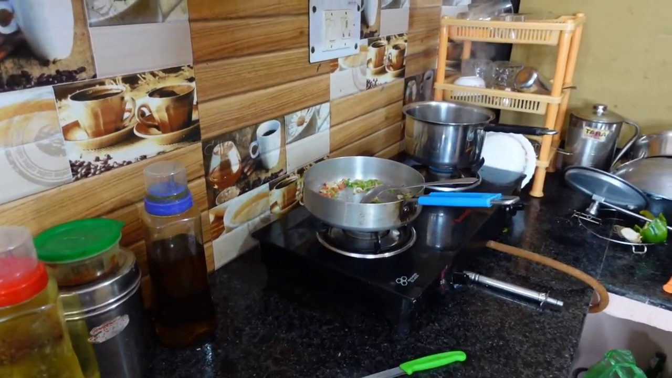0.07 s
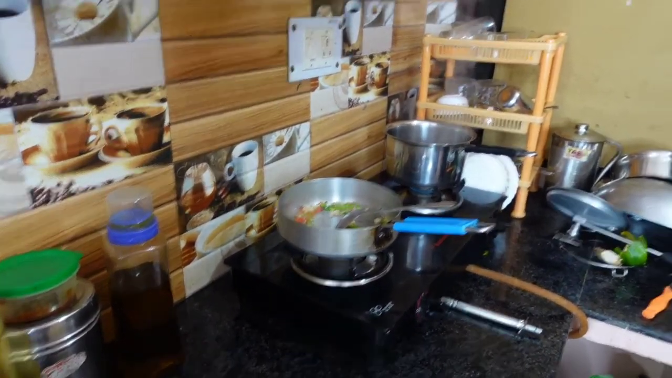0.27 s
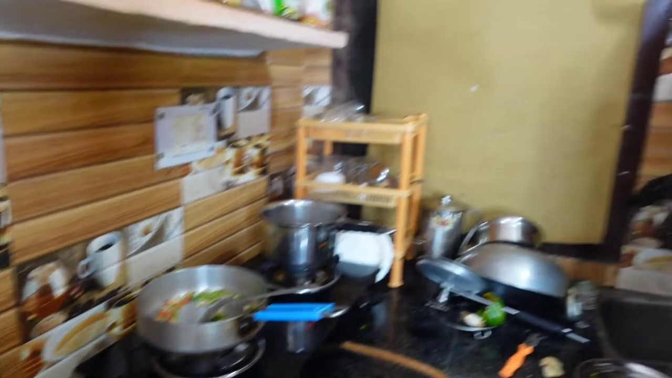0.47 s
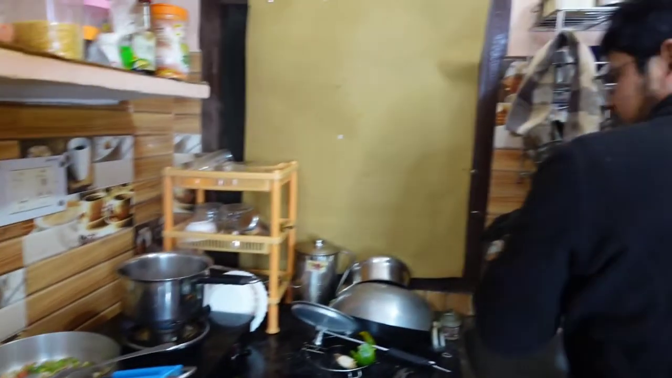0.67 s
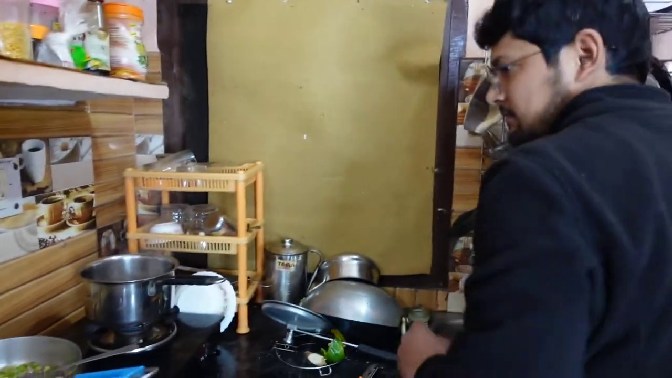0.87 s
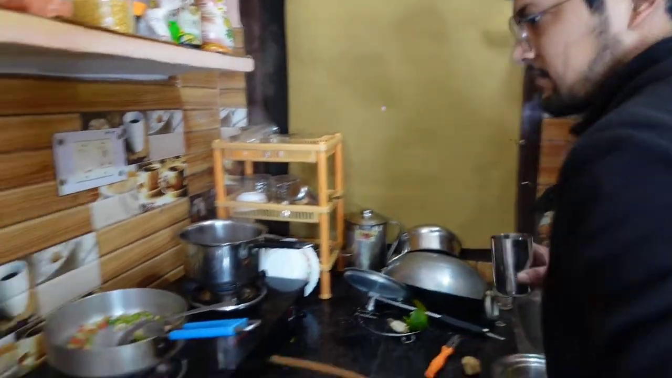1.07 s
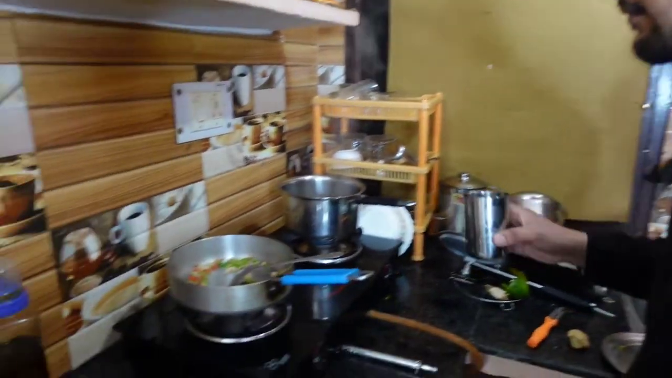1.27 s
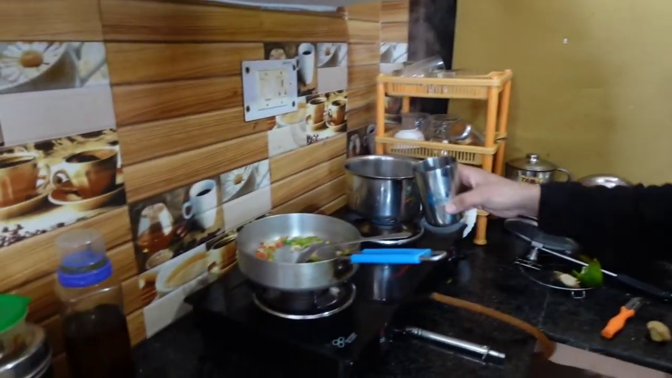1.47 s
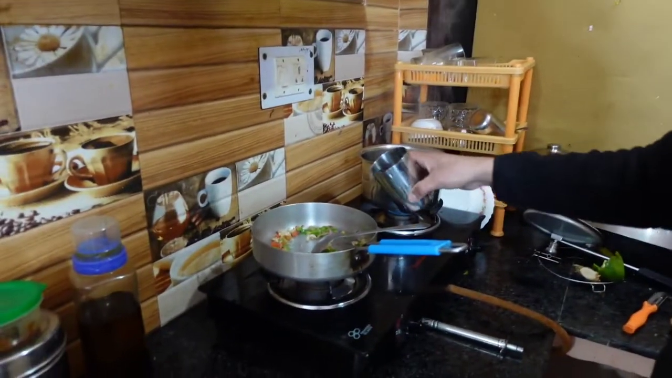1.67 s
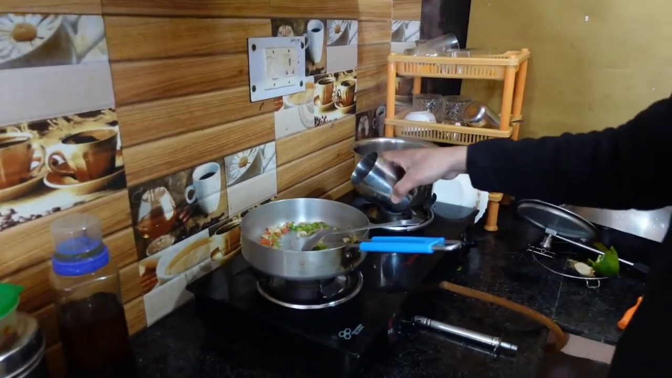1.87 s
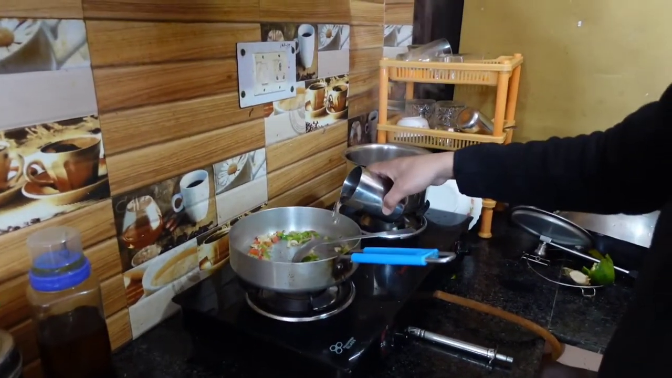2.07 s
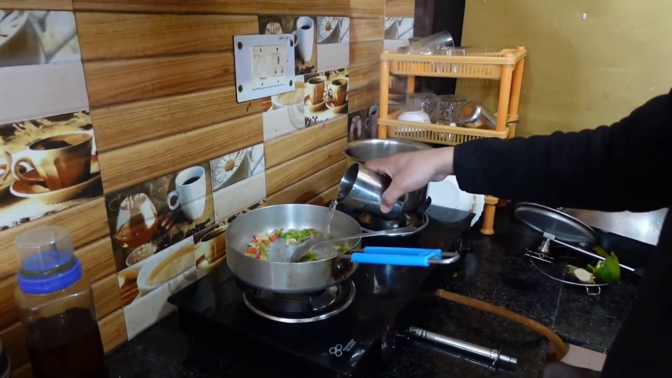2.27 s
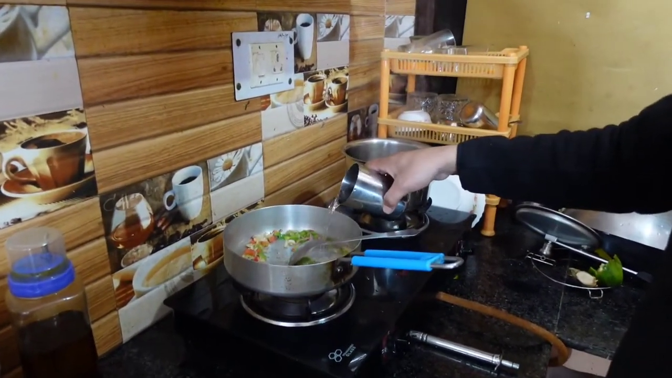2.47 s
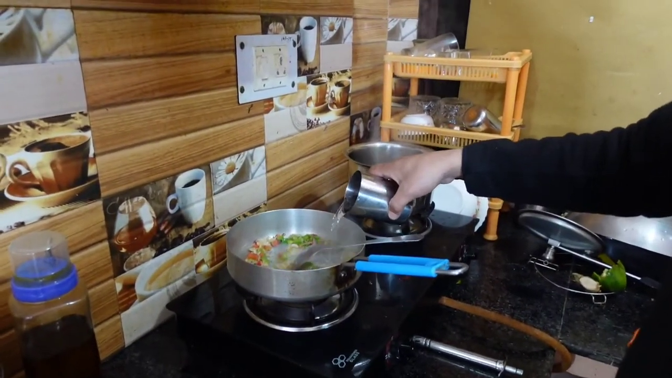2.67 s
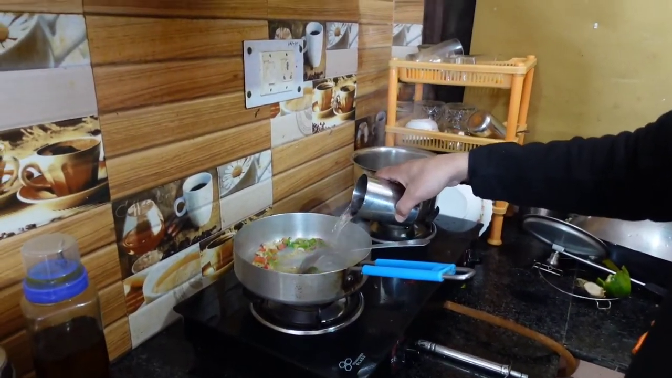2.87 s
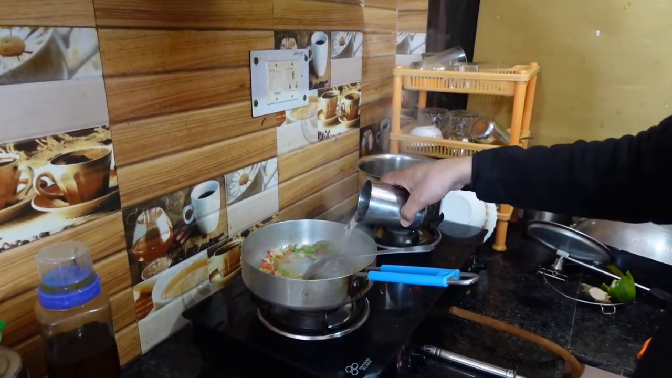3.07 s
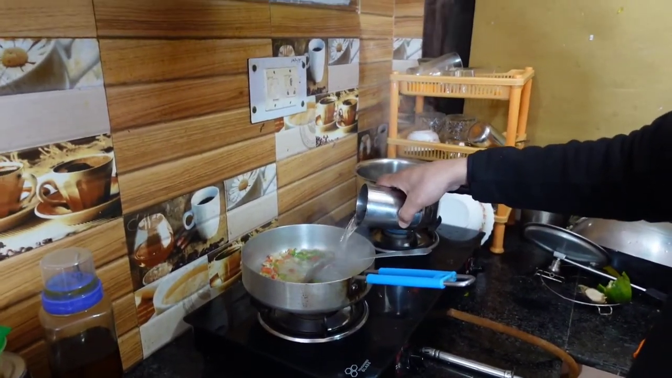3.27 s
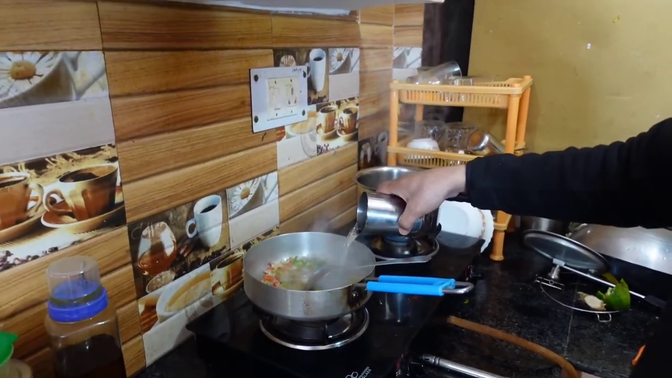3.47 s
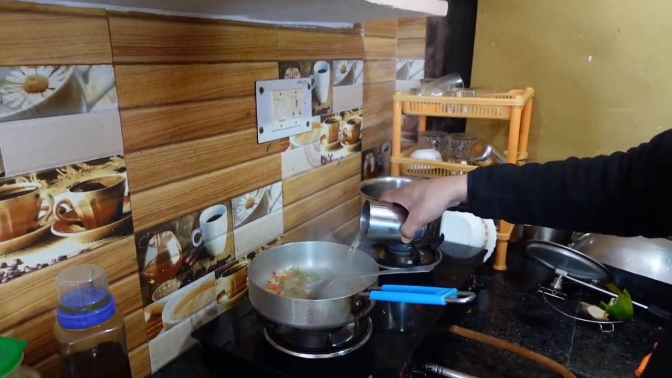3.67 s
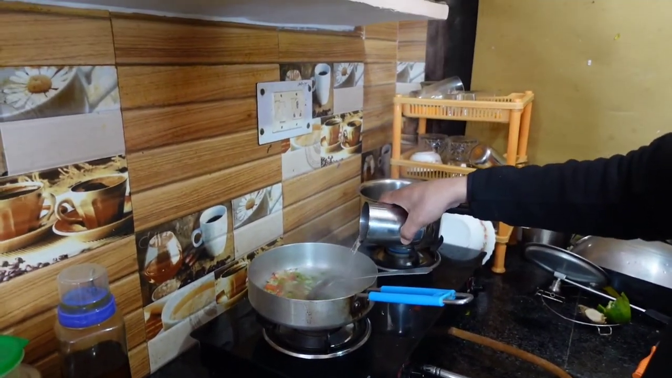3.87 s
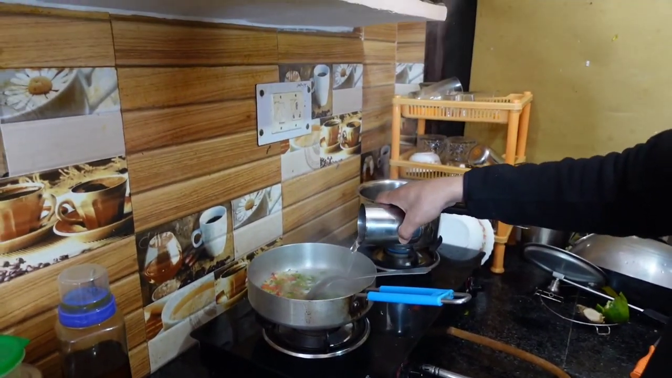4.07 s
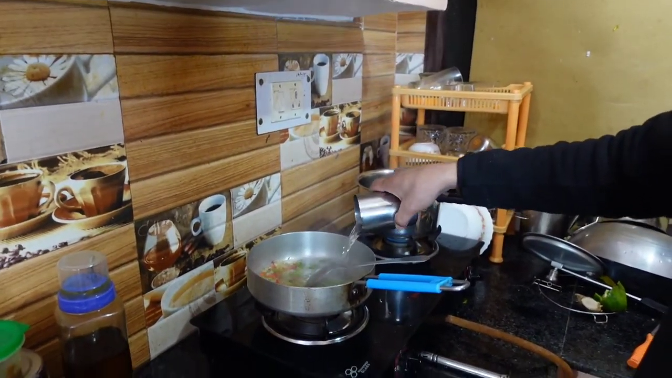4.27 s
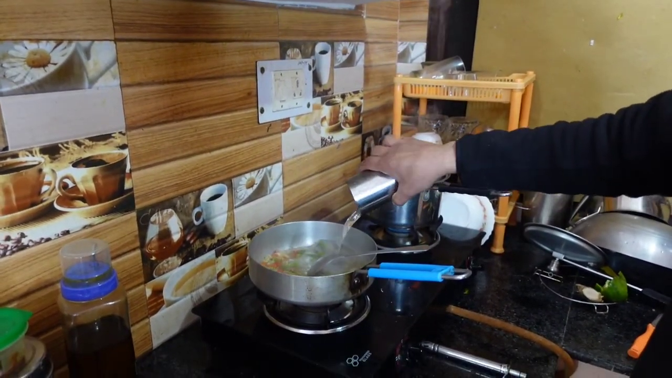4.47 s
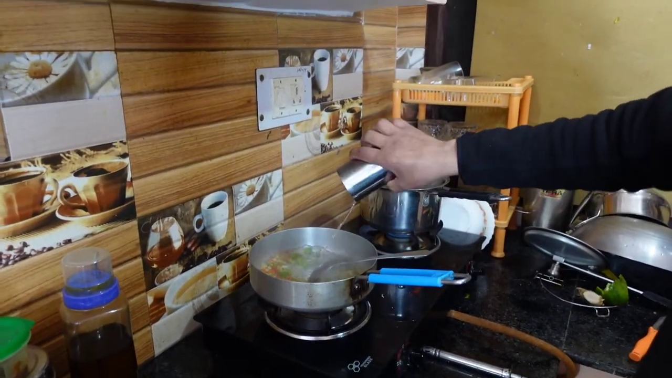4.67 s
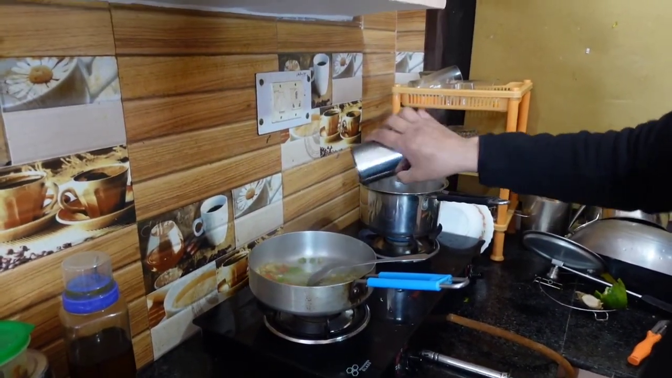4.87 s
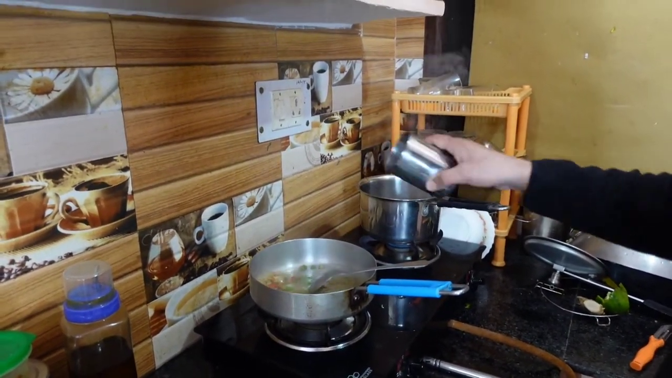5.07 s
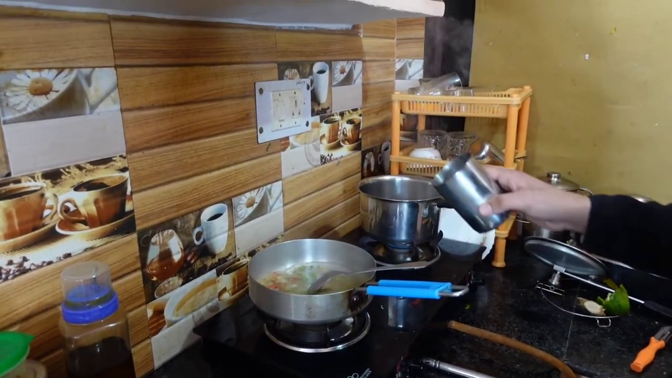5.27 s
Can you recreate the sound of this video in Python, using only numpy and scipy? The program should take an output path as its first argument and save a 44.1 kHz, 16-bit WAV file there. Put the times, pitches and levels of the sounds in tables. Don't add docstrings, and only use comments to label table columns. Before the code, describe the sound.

In a small tiled kitchen, vegetables fry gently in a metal pan with sharp oil spits, while the handheld camera thuds and rumbles. Just after two seconds water is poured in and a loud, dense hiss surges up, peaks, then eases into a bubbling, spitting boil with a couple of last drops from the cup. Close microphone, short room reflections.

```python
import sys
import numpy as np
from scipy import signal
from scipy.fft import rfft, irfft, next_fast_len
from scipy.io import wavfile
from scipy.ndimage import uniform_filter1d

SR = 44100
rng = np.random.default_rng(int(sys.argv[2]) if len(sys.argv) > 2 else 0)


def transcribe(signal):
    frames = np.atleast_2d(signal).T
    limited = np.clip(frames, -1, 1)
    pcm = np.round(limited * 32767).astype(np.int16)
    wavfile.write(sys.argv[1], SR, pcm)


def nominal_scale(level):
    x = np.asarray(level, float) / 20
    return 10 ** x


N = 233957
TIME_S = np.arange(N) / SR


def rms_one(x):
    return x / np.sqrt(np.mean(x ** 2) + 1e-20)


def drift(rate_hz):
    r = np.exp(-2 * np.pi * rate_hz / SR)
    noise = rng.standard_normal(N + SR)
    return rms_one(signal.lfilter([1], [1, -2 * r, r * r], noise)[SR:])


def band(x, low_hz, high_hz, order=2):
    edges_hz = [low_hz, min(high_hz, 20000)]
    return signal.sosfilt(signal.butter(order, edges_hz, "band", fs=SR, output="sos"), x)


def colour(x, spectrum, modes=(), size=8192):
    hz = np.arange(1, size // 2 + 2) * SR / size
    point_hz, point_db = np.transpose(spectrum)
    level_db = np.interp(np.log(hz), np.log(point_hz), point_db)
    for centre_hz, width_hz, peak_db in modes:
        level_db = level_db + peak_db / (1 + (2 * (hz - centre_hz) / width_hz) ** 2)
    cepstrum = irfft(np.log(nominal_scale(level_db)))
    cepstrum[1:size // 2] *= 2
    cepstrum[size // 2 + 1:] = 0
    return signal.fftconvolve(x, irfft(np.exp(rfft(cepstrum))))[:len(x)]


def ring(clicks, hz, t60_s):
    r = nominal_scale(-60 / (t60_s * SR))
    w = 2 * np.pi * hz / SR
    return signal.lfilter([0, np.sin(w)], [1, -2 * r * np.cos(w), r * r], clicks + 1e-18)


# hz, density_db_per_hz
KITCHEN_AIR = [(76, -25), (130, -2), (157, -57), (210, 3), (263, -8.5), (307, 3.5), (352, -11.5),
               (407, 0.5), (498, -11), (804, -9.5), (900, -36), (1170, -52), (1980, -120)]


def kitchen_air():
    hum_modes = [(327, 9.1, 10.5), (750, 13, 12.3)]  # centre_hz, width_hz, peak_db
    return nominal_scale(-58) * rms_one(colour(rng.standard_normal(N), KITCHEN_AIR, hum_modes))


def shaking(low_hz, high_hz, order):
    noise = rms_one(band(rng.standard_normal(N + SR), low_hz, high_hz, order)[SR:])
    envelope = np.abs(signal.hilbert(noise, next_fast_len(N))[:N])
    return rms_one(noise / (0.58 + envelope))


def swell(start_s, level_db, half_s):
    return nominal_scale(level_db) * np.exp(-.5 * ((TIME_S - start_s) / half_s) ** 2)


# centre_s, level_db, pitch_hz, half_s
JOLTS = [(0.067, -34, 89, 0.02), (0.259, -41, 59.4, 0.042), (0.331, -50, 100, 0.033),
         (0.721, -43.5, 94.5, 0.041), (0.872, -46, 59.6, 0.037), (.98, -45, 90, 0.022),
         (1.048, -41, 83.5, 0.036), (1.225, -43.5, 65, .03), (1.287, -42, 62, 0.025),
         (1.421, -40.5, 72.6, 0.029), (1.544, -33, 65, 0.033), (1.622, -44, 60, .03), (1.787, -50, 89, .03),
         (2.323, -46, 70, 0.025), (3.005, -46.5, 65, 0.074)]
# centre_s, level_db, half_s
SWINGS = [(0.052, -48.5, 0.11), (0.273, -43, 0.1), (.4, -39, 0.061), (.7, -44, .07), (0.947, -47, 0.066),
          (1.19, -35.5, 0.067), (1.42, -43, 0.038), (1.7, -44.5, 0.078), (1.985, -43, 0.067),
          (2.298, -49.5, 0.11), (2.9, -51, 0.15), (4.38, -55, 0.05)]
# time_s, level_db
HOLD = [
    (0, -49),
    (1.8, -60.5),
    (2.3, -60),
    (5.3, -60.5),
]


def handling():
    hold_db = np.interp(TIME_S, *np.transpose(HOLD))
    effort = nominal_scale(hold_db - 2.0) + sum(swell(*row) for row in SWINGS)
    sway = effort * shaking(6.0, 20.3, order=2)
    tremor = shaking(36, 107.0, order=3)
    jolts = 0
    for s, level_db, hz, half_s in JOLTS:
        wobble = np.sin(2 * np.pi * hz * (TIME_S - s))
        jolts = jolts + swell(s, level_db, half_s) * (0.41 * tremor + 0.77 * wobble)
    return band(sway + nominal_scale(hold_db) * tremor + jolts, 8.2, 119, order=3)


def bursts(per_s, spread_db, clump_db):
    sizes = nominal_scale(spread_db * np.minimum(rng.exponential(1, N), 3.8)) * rng.choice([-1, 1], N)
    chance = np.clip(per_s, 30, 20000) * nominal_scale(clump_db * drift(18)) / SR
    return sizes * (rng.random(N) < chance)


def bubbles(clicks, low_hz, high_hz, cycles, count=18):
    dealt = rng.integers(0, count, N)
    out = 0
    for k, hz in enumerate(np.geomspace(low_hz, high_hz, count)):
        ringing = ring(clicks * (dealt == k), hz, cycles / hz)
        out = out + np.sqrt(hz) * rms_one(ring(ringing, hz, 1.7 / hz))
    return rms_one(out)


def puffs(clicks, decay_s, tail_s, tail_share):
    power = 0
    for s, share in (decay_s, 1 - tail_share), (tail_s, tail_share):
        keep = np.exp(-2 / (s * SR))
        power = power + share * signal.lfilter([1 - keep], [1, -keep], clicks ** 2 + 1e-18)
    return rms_one(np.sqrt(np.abs(power)) * rng.standard_normal(N))


def steady(x, window_s):
    return x / np.sqrt(uniform_filter1d(x ** 2, round(window_s * SR)) + 1e-9)


# hz, density_db_per_hz
PAN = [(88, -41), (150, -31), (352, -27.5), (453, -25.5), (751, -21.5), (966, -12), (1090, -11.5),
       (2920, 3.5), (3690, 3.5), (4650, -11), (6110, -7.5), (7000, -16), (9540, -12), (15500, -25)]
# centre_hz, width_hz, peak_db over the trend
PAN_MODES = [(355, 36, -7.5), (455, 45, 6.5), (510, 23, -5), (707, 14, 7), (825, 8.1, 12), (988, 52, 8.5),
             (1469.6, 32, 5.5), (2232, 57, 7.5), (2583, 330, 3.5), (2963, 80, 4.5), (3600, 23, 7.5),
             (4300, 340, 1), (4560, 220, -4.5), (5340, 720, -2.5)]
# time_s, level_db
FRYING = [
    (0.0, -46),
    (1.4, -49),
    (1.48, -44.5),
    (1.62, -46.5),
    (2.2, -43.5),
]
# time_s, level_db
FLASHING = [
    (2.218, -46),
    (2.237, -36.5),
    (2.28, -27),
    (2.34, -21),
    (2.45, -19.5),
]
# time_s, level_db
CALMING = [
    (2.6, -17.5),
    (2.86, -16),
    (3.2, -17),
    (3.55, -16.5),
    (3.95, -19),
    (4.3, -23),
    (4.75, -25.5),
    (5.3, -27.5),
]


def sizzle():
    pour_s, soak_s, flash_s, roll_s = 2.22, 0.57, 0.35, 0.72
    since_s = np.maximum(TIME_S - pour_s, 0)
    wet = 1 - np.exp(-since_s / soak_s)
    fry_per_s, flash_per_s, boil_per_s = 830, 2700, 1500
    wet_per_s = boil_per_s * np.exp(-.22 * since_s) + (flash_per_s - boil_per_s) * np.exp(-since_s / flash_s)
    per_s = np.where(TIME_S < pour_s, fry_per_s, wet_per_s)

    vigour_s, vigour_db = np.transpose(FRYING + FLASHING + CALMING)

    def vigour(lead_s, dry_db, flooded_db):
        return np.interp(TIME_S + lead_s, vigour_s, vigour_db) + np.interp(wet, [0, 1], [dry_db, flooded_db])

    mist_lead_s = 0.017
    large_db = vigour(-0.021, -6, -5.5)
    fine_db = vigour(0, 0, 0)
    spray_db = vigour(mist_lead_s / 2, -1, -8.5)
    mist_db = vigour(mist_lead_s, -3, -14.5)

    clicks = bursts(per_s, spread_db=2.5, clump_db=2.5)
    vapour = puffs(clicks, decay_s=.0009, tail_s=.03, tail_share=.55)
    ringing = bubbles(clicks, 650, 8380, cycles=13.0)
    source = nominal_scale(-2.0) * vapour + nominal_scale(-9.5) * ringing + nominal_scale(-2.5) * rng.standard_normal(N)
    ticks = puffs(bursts(per_s / 8, spread_db=4.0, clump_db=4.0), decay_s=.0007, tail_s=.012, tail_share=.3)
    snaps = rms_one(bursts(per_s * .06, spread_db=2.6, clump_db=3.0))
    source = source + nominal_scale(-11 + .8 * since_s) * snaps

    heard = colour(source, PAN, PAN_MODES)
    bright = colour(source + nominal_scale(-13.5) * ticks, PAN, PAN_MODES)
    brightest = colour(source + nominal_scale(-3.5) * ticks, PAN, PAN_MODES)

    roll_db = np.interp(np.exp(-since_s / roll_s), [0, 1], [1.5, -6.0]) + 2.0 * drift(8.2)
    rumble = nominal_scale(0.58 * large_db - 27.5 + roll_db) * steady(band(heard, 88, 538, order=3), 0.35)
    large = nominal_scale(large_db) * steady(band(heard, 505, 1774, order=3), 0.15)
    fine = nominal_scale(fine_db - 2.07) * steady(band(heard, 1590, 6520, order=3), 0.31)
    spray = nominal_scale(spray_db) * steady(band(bright, 4960, 10300, order=3), 0.097)
    mist = nominal_scale(mist_db) * steady(band(brightest, 10350, 24300, order=3), 0.76)
    return large - rumble - fine + spray - mist


def spits(table, cycles, puff_db, gain_db, spray_db, thump_db):
    size = 900
    out, t = np.zeros(N + size), np.arange(size) / SR
    for start_s, peak_db, hz, bright_db in table:
        burst = nominal_scale(puff_db) * rng.standard_normal(size) * np.exp(-t / .0011)
        burst[0] -= 1
        snap = colour(burst, PAN, size=512)
        parts = [(-7, ring(burst, hz, cycles / hz)),
                 (-2.5, snap),
                 (spray_db + 1.81 * bright_db, band(snap, 5300, 23600)),
                 (thump_db - 1.05 * bright_db, band(snap, 650, 1280))]
        spit = sum(nominal_scale(level_db) * part / np.abs(part).max() for level_db, part in parts)
        out[round(start_s * SR):][:size] += nominal_scale(peak_db + gain_db) * spit / np.abs(spit).max()
    return out[:N]


# start_s, peak_db, pitch_hz, brightness_db
OIL_SPITS = [(0.0164, -23, 3500, -20), (0.0465, -22, 3470, -14), (0.2423, -20, 3690, -13),
             (0.2972, -20, 3700, -14), (0.4936, -11.5, 3060, -11), (0.598, -25, 3040, -26),
             (0.6773, -16, 2820, -12.5), (0.9067, -19.5, 2540, -16.5), (1.0595, -22, 2710, -13),
             (1.0882, -19.5, 3620, -13), (1.1372, -17, 3520, -13), (1.177, -19, 2890, -13),
             (1.2263, -22, 3010, -16), (1.3026, -16, 3090, -14.5), (1.4252, -22, 3050, -15.5),
             (1.476, -15.5, 2650, -23), (1.505, -20, 3600, -11), (1.5429, -20, 2820, -14),
             (1.6366, -23, 2570, -12), (1.6707, -15.5, 2800, -13), (1.7, -31, 3470, -16),
             (1.8332, -27, 3620, -8), (1.85, -13, 3550, -15), (1.914, -20, 2800, -16),
             (1.9744, -25, 3650, -22), (2.003, -28, 2600, -17), (2.0196, -18, 3920, -21),
             (2.0414, -14.5, 2650, -11.5), (2.119, -19, 3460, -10), (2.1996, -21, 3710, -9)]


def oil_spits():
    return spits(OIL_SPITS, 5, -14, -1.0, spray_db=24, thump_db=-48.5)


# start_s, peak_db
FRY_TICKS = [(0.0816, -36), (0.3445, -24), (0.6379, -38), (0.784, -39), (0.843, -36), (1.1567, -21),
             (1.3862, -26), (1.4324, -25), (1.5234, -19), (1.5514, -29), (1.614, -22), (1.6224, -30),
             (1.78, -24), (1.898, -31), (2.126, -20), (2.156, -29)]
# start_s, peak_db
LATE_TICKS = [(4.2094, -11), (4.394, -3), (4.4702, -22), (4.594, -15), (4.7192, -29), (4.795, -9),
              (4.9254, -25), (4.996, -30), (5.0664, -11), (5.0734, -27.5), (5.1068, -11), (5.1482, -26),
              (5.2594, -26)]


def fat_ticks():
    table = [(start_s, peak_db, 9500, 0) for start_s, peak_db in FRY_TICKS + LATE_TICKS]
    return spits(table, 6.0, -15.0, -3.0, spray_db=20.0, thump_db=-43)


# start_s, peak_db, pitch_hz, brightness_db
BROTH_SPITS = [(2.3555, 2, 3500, -12), (2.4854, -10, 2490, -14), (2.5638, -3, 3560, 0),
               (2.8294, 1.5, 2170, -15.5), (2.8664, -1, 2780, -24), (2.8904, -2, 3330, -23),
               (3.1754, -6, 2940, -18), (3.3224, -3.5, 2100, -29), (3.4094, -3, 3530, -20),
               (3.6174, -1, 3030, -16.5), (3.7364, -4, 2650, -23), (3.8794, 2, 2260, -21),
               (4.0034, -5, 2750, -15), (4.1634, 0, 3530, -28), (4.2418, -8, 3050, -13),
               (4.3395, -5, 2560, -18), (4.3924, -1.5, 3640, -21), (4.4692, -12, 3010, -19),
               (4.4992, -8, 2510, -9), (4.5245, -6, 2510, -3), (4.6059, -5, 3610, -18),
               (4.6314, -2.5, 2570, -24), (4.7614, -9, 2260, -18), (4.8444, -3.5, 3020, -26),
               (4.8803, -11, 3030, -22), (4.9551, -8, 3000, -23), (5.0355, -2, 3040, -15),
               (5.1487, -6, 2970, -29), (5.1781, -9.5, 2880, -20), (5.2819, -5.5, 3040, -27.5)]


def broth_spits():
    return spits(BROTH_SPITS, 9, -13, -0.37, spray_db=21, thump_db=-38.5)


# start_s, peak_db, pitch_hz, decay_s
DROPS = [
    (4.632, -14, 1090, .005),
    (4.801, -9, 570, 0.0011),
]


def drops():
    size = 2000
    out, t = np.zeros(N + size), np.arange(size) / SR
    for start_s, peak_db, hz, decay_s in DROPS:
        plop = np.exp(-t / decay_s) * np.sin(2 * np.pi * hz * t * (1 + 15 * t))
        out[round(start_s * SR):][:size] += nominal_scale(peak_db - 9.5) * plop
    return out[:N]


# delay_s, level_db
BENCH_ECHOES = [
    (.0017, -10.5),
    (.0045, -16),
]


def around(x):
    t60_s, treble_t60_s, room_db = .28, 0.19, -8
    t = np.arange(SR // 2) / SR
    tail = rng.standard_normal(len(t)) * nominal_scale(-60 * t / t60_s) * np.clip(t / .004, 0, 1)
    tail = 0.81 * tail * nominal_scale(-60 * t / treble_t60_s) + signal.lfilter([.45], [1, -.55], tail)
    response = nominal_scale(room_db) * tail / np.sqrt(np.sum(tail ** 2))
    response[0] += 1
    for delay_s, echo_db in BENCH_ECHOES:
        response[round(delay_s * SR)] += nominal_scale(echo_db)
    return signal.fftconvolve(x, response)[:N]


def scene():
    hits = band(oil_spits() + fat_ticks() + broth_spits(), 760, 15000)
    hits = hits + band(drops(), 130, 4000)
    return (kitchen_air() + handling() + sizzle() + around(hits))[None]


def band_limit(x):
    return signal.sosfilt(signal.butter(12, 16800, fs=SR, output="sos"), x)


def record(dry):
    overload, cutoff_hz = .88, 15780
    rounded = dry / (1 + np.abs(dry / overload) ** 4) ** .25
    steep = signal.ellip(12, .3, 60, cutoff_hz, fs=SR, output="sos")
    return band_limit(signal.sosfilt(steep, rounded))


dry = scene()
out = record(dry)
transcribe(out)
```